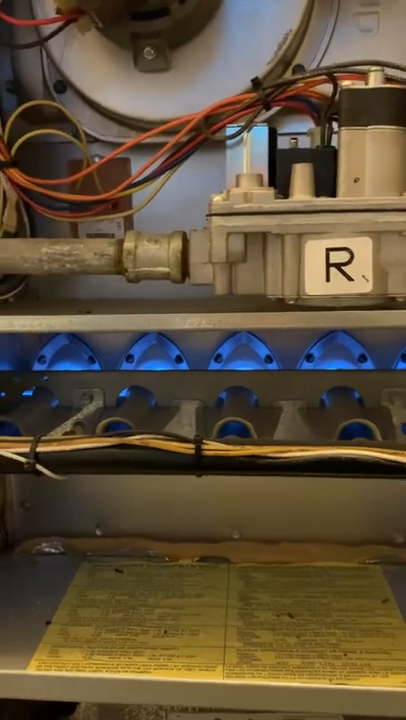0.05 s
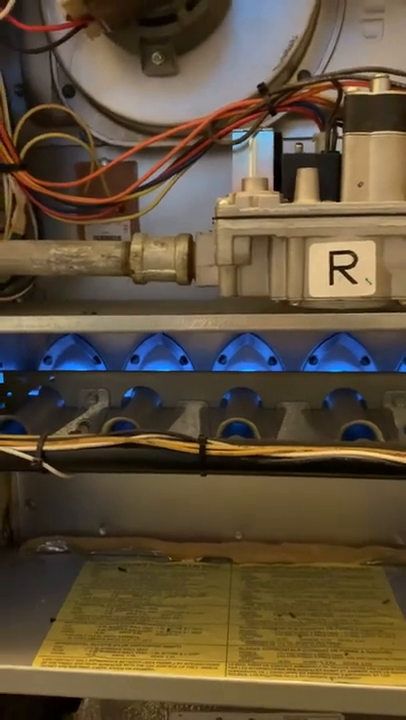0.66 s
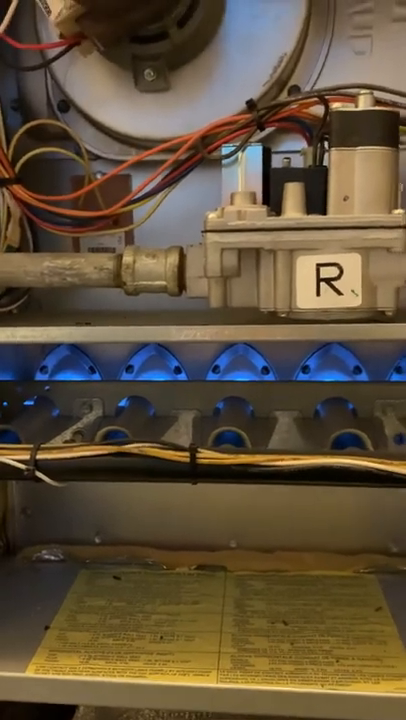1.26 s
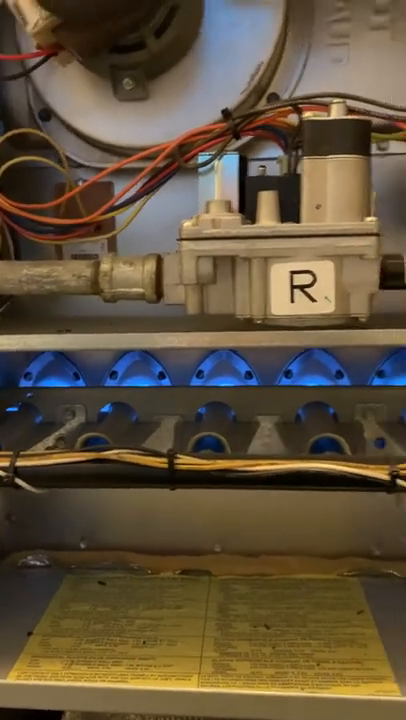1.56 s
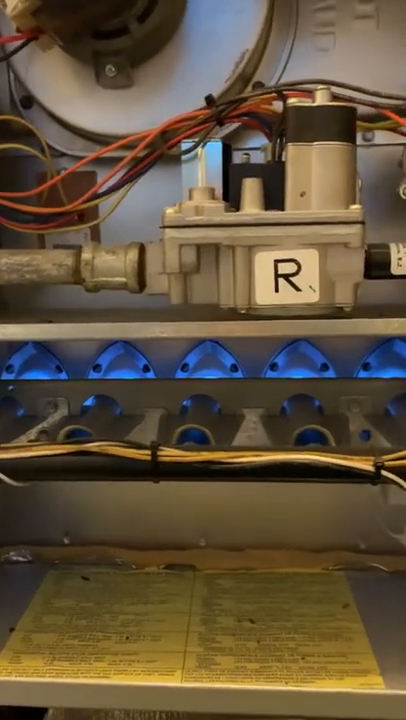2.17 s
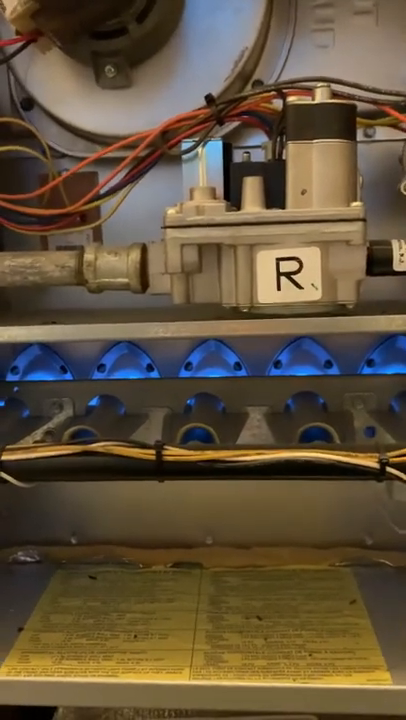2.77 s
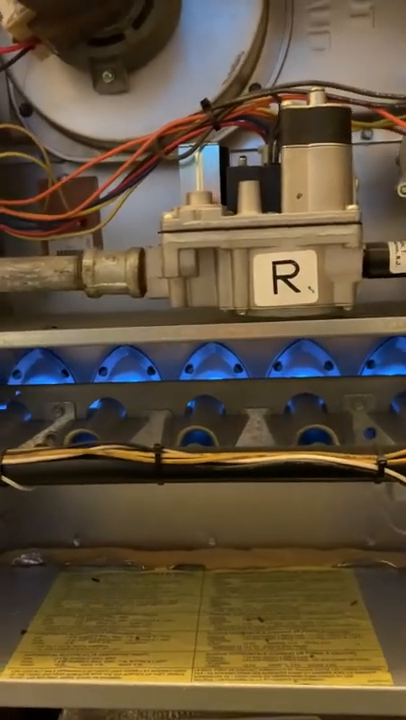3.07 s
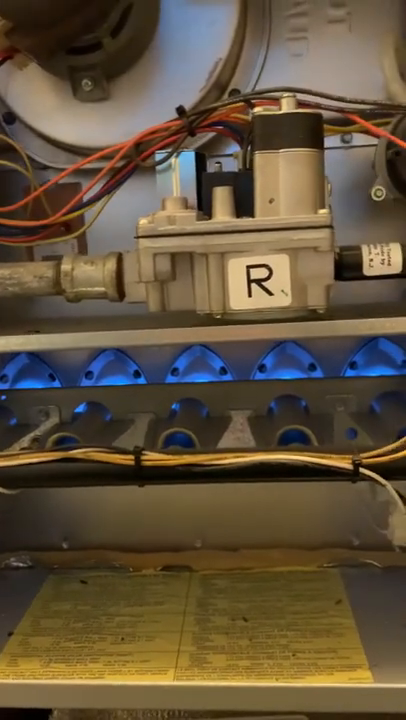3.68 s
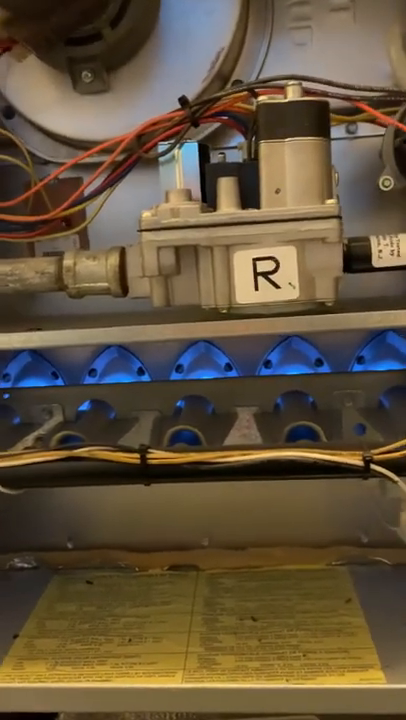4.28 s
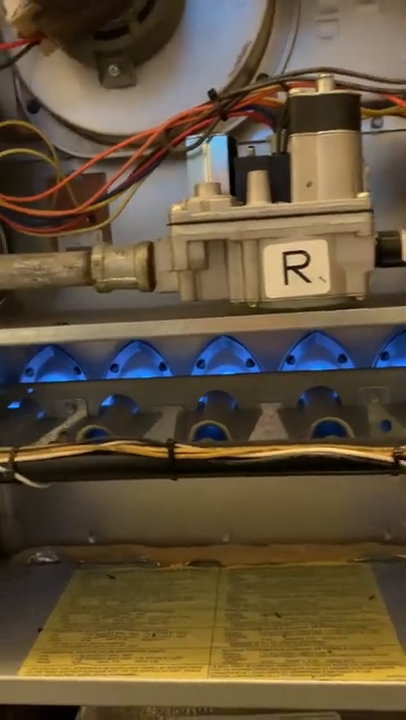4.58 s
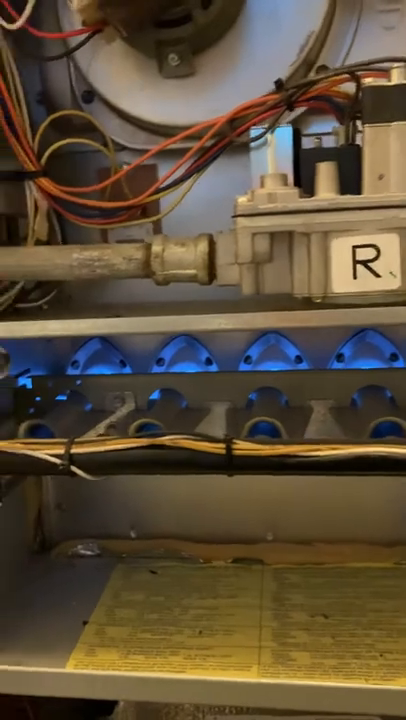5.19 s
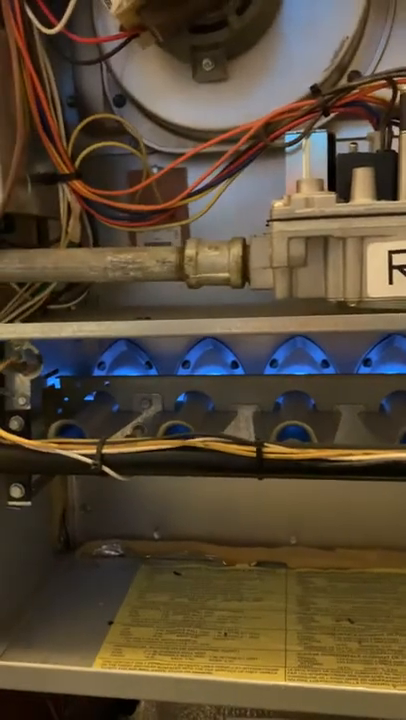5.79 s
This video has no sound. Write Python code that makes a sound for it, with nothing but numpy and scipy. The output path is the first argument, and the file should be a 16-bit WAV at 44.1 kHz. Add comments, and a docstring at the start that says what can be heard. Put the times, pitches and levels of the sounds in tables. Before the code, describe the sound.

A gas furnace burns with a steady low flame rumble, rushing fan air and a hiss of gas with faint high whistles.

```python
"""A gas furnace burning

Heard through two hand-held microphones close to the open cabinet. The fan rushes and its motor
whines, while gas hisses through the valve and jets with two thin, high whistles. Over them the
swirling flames roar at the burner mouths and rumble in the metal tubes, with soft, low puffs."""
import sys
import numpy as np
from scipy import signal
from scipy.fft import rfft, irfft, next_fast_len
from scipy.io import wavfile
from scipy.ndimage import map_coordinates

SR = 44100
rng = np.random.default_rng(int(sys.argv[2]) if len(sys.argv) > 2 else 0)


def master(y):
    """Save y as 16-bit WAV."""
    cut = np.clip(np.atleast_2d(y).T, -1, 1)
    pcm = np.round(cut * 32767)  # scale
    wavfile.write(sys.argv[1], SR, pcm.astype(np.int16))


N = 261513


def amp(db):
    """Turn decibels into a gain to multiply by."""
    return 10 ** (np.asarray(db) / 20)


def over_pitch(points, hz):
    """Join (frequency, value) points with straight lines on a log frequency axis."""
    point_hz, values = np.transpose(points)
    return np.interp(np.log(hz + 1), np.log(point_hz + 1), values)


def over_time(rows):
    """One value per sample for each column after the time."""
    times, *columns = np.transpose(rows)
    return [np.interp(np.arange(N) / SR, times, column) for column in columns]


def wobble(rate):
    """A smooth curve through `rate` random values a second."""
    place = np.arange(N) * rate / SR
    steps = np.arange(0, place[-1] + 1, 1 / 10)
    values = rng.standard_normal(int(N * rate / SR) + 4)
    return np.interp(place, steps, map_coordinates(values, [steps]))


def bins():
    """The frequencies of a spectrum, in Hz."""
    return np.fft.rfftfreq(2 * next_fast_len(N // 2 + 1), 1 / SR)


def white():
    """The spectrum of a new white noise of 0 dB per Hz."""
    size = len(bins())
    return (rng.standard_normal(size) + 1j * rng.standard_normal(size)) * np.sqrt(size * SR / 2)


def waveform(spectrum):
    """Turn a spectrum into samples."""
    return irfft(spectrum)[..., :N]


def stereo_white(likeness):
    """Left and right white noise spectra: likeness 1 is identical, 0 is unrelated."""
    turn = np.arccos(np.clip(likeness, -1, 1)) / 2
    mid, side = np.cos(turn) * white(), np.sin(turn) * white()
    return np.array([mid + side, mid - side])


def stereo_gains(pan_db, lead):
    """Two gains that make the left side pan_db louder and `lead` radians ahead of the right."""
    left = amp(pan_db / 2) * np.exp(1j * np.atleast_1d(lead) / 2)
    return np.array([left, 1 / left]) / np.sqrt((amp(pan_db) + amp(-pan_db)) / 2)


def resonance(centre_hz, width_hz):
    """A peak of height 1 around the pitch at which something rings."""
    return 1 / (1 + ((bins() - centre_hz) / width_hz) ** 2 * np.sqrt(np.e))


def tone(hz, db, pan_db, lead, drift_hz):
    """A stereo tone, slightly unsteady in pitch and loudness."""
    pitch_hz = hz + drift_hz * (wobble(3) / 2 + wobble(60))
    phase = 2 * np.pi * np.cumsum(pitch_hz) / SR
    waver = 1 + .3 * np.tanh(wobble(5))
    return np.sqrt(2) * amp(db) * waver * np.real(stereo_gains(pan_db, lead) * np.exp(1j * phase))


def standing_waves(depth_db, spacing_hz):
    """Echoes between the metal walls lift some frequencies and weaken their neighbours."""
    place = bins() / spacing_hz
    heights = rng.standard_normal(int(place[-1]) + 2)
    ripple = amp(depth_db * np.interp(place, np.arange(len(heights)), heights))
    return ripple / np.sqrt(np.mean(ripple ** 2))


def hand_drift(spectrum, depth_db, spacing_hz, drift_s=1.2):
    """The hand carries the microphones from one pattern of echoes into the next."""
    place = np.arange(N) / SR / drift_s
    fades = [np.cos(np.pi / 2 * np.clip(place - k, -1, 1)) ** 2 for k in range(int(place[-1]) + 2)]
    return sum(fade * waveform(spectrum * standing_waves(depth_db, spacing_hz)) for fade in fades)


# Tones of the fan motor: (pitch [Hz], level [dB], left over right [dB], left lead [rad])
MOTOR_TONES = [(930, -57.6, -1, -1.7), (1050, -63, 4, -1), (1567, -62, -3, 0), (1741, -60.5, -7, 0),
               (2080, -67, -8, .3), (3098, -72, 0, 2.7), (3184, -68.5, 3, 2.5), (3619, -71, -3, 2.5),
               (3789, -71, 0, 1)]


def motor_whine():
    """The fan motor sings faintly at a constant speed; higher tones wander more."""
    return sum(tone(hz, db, pan_db, lead, drift_hz=0.00208 * hz) for hz, db, pan_db, lead in MOTOR_TONES)


# The rush of the fan's air: (frequency [Hz], level [dB per Hz])
AIR_SPECTRUM = [(200, -97), (600, -75), (700, -75), (880, -74.6), (1300, -78.2), (1850, -80), (2300, -81.5),
                (2470, -85), (2700, -88.5), (3300, -88), (4200, -84), (5050, -105), (6100, -92),
                (7000, -128)]
# Where the air in the cabinet rings:
# (pitch [Hz], width [Hz], level [dB per Hz], left over right [dB], left lead [rad])
CABINET_RESONANCES = [(610, 60, -69.8, 7.5, -2.1), (777, 45, -74, 3, -1.5), (1025, 80, -66.8, 0, -1.2),
                      (1125, 115, -67.9, 2, -1.2), (1440, 90, -72.3, -6, -.7), (1610, 150, -72.6, -4, .5),
                      (2100, 165, -72.2, -7, 1.1), (2320, 42, -71.8, -11, 2), (2605, 50, -80, -2, 1.2),
                      (2880, 380, -80.3, 0, 2.4), (4460, 65, -81, -2, 1.4), (4590, 140, -78.4, -2, 2.2),
                      (4820, 70, -85, 0, 2.9)]


def fan_rush(likeness=0.013, flutter_db=1.0):
    """Fan air fills the cabinet; each resonance reaches the two microphones in its own way."""
    air = stereo_white(likeness) * amp(over_pitch(AIR_SPECTRUM, bins()))
    for hz, width_hz, db, pan_db, lead in CABINET_RESONANCES:
        air += amp(db) * resonance(hz, width_hz) * white() * stereo_gains(pan_db, lead)
    return hand_drift(air, depth_db=2.0, spacing_hz=14) * amp(flutter_db * wobble(120))


# The hiss of the gas jets: (frequency [Hz], level [dB per Hz])
JET_SPECTRUM = [(1500, -105), (3500, -91), (5100, -87.3), (5700, -85.5), (6900, -86.3), (7750, -82.7),
                (8400, -86.7), (9100, -85.7), (10200, -84.3), (11200, -83.2), (12800, -83.3), (13500, -89),
                (14000, -90), (14900, -88.5), (15700, -100)]
# Where the valve and the pipe feeding the jets ring: (pitch [Hz], width [Hz], level [dB per Hz])
PIPE_RESONANCES = [(5690, 150, -84.5), (6140, 270, -72), (9560, 220, -82)]
# Stereo image of the hiss; left and right are opposite around 9-10 kHz:
# (frequency [Hz], left lead [rad], left-right likeness [0 to 1])
HISS_STEREO = [(4000, 1.7, .6), (4900, 2.95, .97), (5050, 3.14, .998), (5200, 3.4, .98), (6000, 5.2, .85),
               (7000, 6.3, .99), (8200, 7.2, .75), (8850, 8.7, .9), (9100, 9.42, 1), (10200, 9.43, 1),
               (10450, 10.1, .9), (11200, 11, .78), (12000, 12.5, .995), (12900, 12.6, .995),
               (13400, 13.4, .85), (14000, 15.6, .99), (14400, 15.71, 1)]
# The slow swell of the hiss: (time [s], level change [dB])
HISS_SWELL = [(0, 0), (1.3, -0.2), (2.2, 0), (3, 0.5), (3.7, -0.5), (4.6, .2), (5.9, 0.2)]


def gas_hiss(sputter_db=0.95, flow_db=0.66):
    """Gas hisses out of the jets and makes the valve and pipe ring."""
    hz, stereo = bins(), np.array(HISS_STEREO)
    ring_power = sum((amp(db) * resonance(pitch, width)) ** 2 for pitch, width, db in PIPE_RESONANCES)
    colour = np.sqrt(amp(over_pitch(JET_SPECTRUM, hz)) ** 2 + ring_power)
    lead = over_pitch(stereo[:, [0, 1]], hz)
    likeness = over_pitch(stereo[:, [0, 2]], hz)
    spectrum = stereo_white(likeness) * stereo_gains(0, lead) * colour
    hiss = hand_drift(spectrum, depth_db=2.5, spacing_hz=44.76)
    swell_db, = over_time(HISS_SWELL)
    return hiss * amp(swell_db + sputter_db * wobble(400) + flow_db * wobble(16))


# The valve's upper and lower whistle: (pitch [Hz], pitch wander [Hz])
WHISTLE_PITCHES = [(12891, 6), (11872, 15)]
# They rise and fall slowly: (time [s], upper whistle level [dB], lower whistle level [dB])
WHISTLE_LEVELS = [(0, -66, -69), (.9, -65, -65), (1.1, -62, -65), (1.3, -55.5, -66), (1.5, -60, -64),
                  (1.7, -59.3, -58.5), (2.1, -65, -62), (2.55, -65, -61), (3, -57.3, -59.5),
                  (3.6, -61.5, -72), (4.1, -62, -72), (4.4, -59, -68), (4.9, -59.5, -67), (5.7, -68, -67)]


def valve_whistles():
    """Gas blowing over edges in the valve makes two thin, high whistles."""
    return sum(tone(hz, db, pan_db=-2, lead=.2, drift_hz=drift_hz)
               for (hz, drift_hz), db in zip(WHISTLE_PITCHES, over_time(WHISTLE_LEVELS)))


# The open roar of the flames: (frequency [Hz], level [dB per Hz])
ROAR_SPECTRUM = [(60, -69), (150, -52.5), (178, -55.5), (208, -51), (262, -51.5), (292, -61), (395, -66.5),
                 (445, -64), (505, -66), (590, -68.5), (700, -78), (1200, -105), (4000, -120)]
# How alike the roar is on both sides: (frequency [Hz], left-right likeness [0 to 1])
ROAR_LIKENESS = [(150, 1), (280, 0.73), (380, 0.68), (470, 0.53), (570, 0)]


def burner_roar(pan_db=6.0, flicker_db=1.15):
    """The flames flutter at the burner mouths, to the left."""
    colour = amp(over_pitch(ROAR_SPECTRUM, bins())) * standing_waves(depth_db=0.63, spacing_hz=9.8)
    noise = stereo_white(over_pitch(ROAR_LIKENESS, bins()))
    flames = waveform(noise * colour * stereo_gains(pan_db, 0))
    return flames * amp(flicker_db * wobble(70))


def flame_limit(boom, ceiling_db=7.0):
    """The flames can swing only so far above their average strength."""
    swing = np.abs(signal.hilbert(boom, next_fast_len(N))[:N]) / np.sqrt(2)
    return boom / (1 + (swing / amp(ceiling_db)) ** 6) ** (1 / 6)


def flame_throb(depth_db=0.4, average_hz=14, spread_hz=3.17):
    """The quick, uneven rise and fall of the flames, in dB."""
    rate_hz = average_hz + spread_hz * wobble(13)
    return depth_db * (1 + wobble(8.0) / 2) * np.sin(2 * np.pi * np.cumsum(rate_hz) / SR)


# Soft, low puffs of the flames: (time [s], level at the middle [dB], pitch [Hz])
PUFFS = [(0.365, -12, 84.4), (0.501, -12, 86.4), (0.594, -12.2, 90), (0.909, -15, 93), (1.023, -10.5, 78),
         (1.141, -14, 85.4), (1.231, -15.5, 72), (1.305, -13.5, 84.5), (1.473, -13, 89), (1.606, -13.5, 92),
         (1.788, -13.5, 83), (2.19, -12, 94.5), (2.288, -13.5, 89), (2.467, -15, 86), (2.907, -14, 88),
         (3.302, -14, 81.6), (3.617, -13.5, 86), (3.806, -10, 86), (3.952, -14, 91.3), (4.131, -13.5, 92.7),
         (4.273, -13.5, 87), (4.452, -14, 84.4), (4.638, -12, 87.6), (4.956, -14.5, 80), (5.048, -15, 86),
         (5.613, -15, 97)]


def flame_puffs(boom, length_s=0.058):
    """In a puff the flames fall into step with a low note of the tubes for a few cycles."""
    boom = boom.copy()
    half = int(length_s * SR / 2)
    t = np.arange(-half, half) / SR
    fade = np.hanning(len(t))
    for time_s, db, hz in PUFFS:
        span = round(time_s * SR) + np.arange(-half, half)
        # line the note up with the rumble it briefly replaces
        phase = np.angle(np.sum(fade * boom[span] * np.exp(-2j * np.pi * hz * t)))
        note = np.sqrt(2) * amp(db) * np.cos(2 * np.pi * hz * t + phase)
        boom[span] += fade * (note - boom[span])
    return boom


# The deep rumble of the tubes: (frequency [Hz], relative level [dB])
RUMBLE_SPECTRUM = [(25, -30), (42, -17.5), (53, -3.3), (70, -1.2), (81, -.7), (88, -1.8), (99, 1.2),
                   (111, -3), (123, -4.7), (135, -11.5), (160, -16.5), (180, -26), (300, -44), (900, -100)]
# The slow drift of the fire's strength: (time [s], relative level [dB])
FIRE_STRENGTH = [(0, -18), (.4, -18.5), (1.7, -17), (2.3, -18.5), (3.3, -19), (3.8, -19), (4.6, -18.5),
                 (5.3, -19.5), (5.9, -19.5)]


def tube_rumble(lead_ms=0.49, pan_db=3.5, gain_db=-0.42, steady_s=0.084):
    """Swirling flames stir the tubes' low notes; the steady gas supply evens out all but the puffs."""
    hz = bins()
    boom = waveform(white() * amp(over_pitch(RUMBLE_SPECTRUM, hz)))
    # even out the slow changes in loudness; the fast beating stays random
    window = np.hanning(int(2 * steady_s * SR))
    power = signal.fftconvolve(boom ** 2, window / window.sum(), "same")
    boom = flame_limit(boom / np.sqrt(np.abs(power) + 1e-20))
    fire_db, = over_time(FIRE_STRENGTH)
    boom = flame_puffs(boom * amp(fire_db + gain_db + flame_throb()))
    lead = 2 * np.pi * hz * lead_ms / 1000
    return waveform(rfft(boom, 2 * (len(hz) - 1)) * stereo_gains(pan_db, lead))


def scene():
    """Flames, fan and gas all run together."""
    return tube_rumble() + burner_roar() + fan_rush() + motor_whine() + gas_hiss() + valve_whistles()


def record(dry, low_cut_hz=36, top_hz=15700):
    """Roll off the deepest bass and cut the very highest treble."""
    hz = bins()
    bass_slope = (hz / low_cut_hz) ** 8
    passed = np.sqrt(bass_slope / (1 + bass_slope)) * (hz < top_hz)
    return waveform(rfft(dry, 2 * (len(hz) - 1)) * passed)


dry = scene()
out = record(dry)
master(out)
```